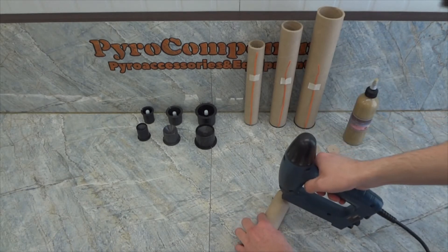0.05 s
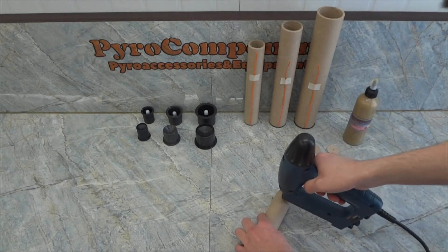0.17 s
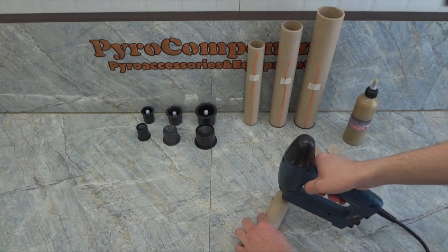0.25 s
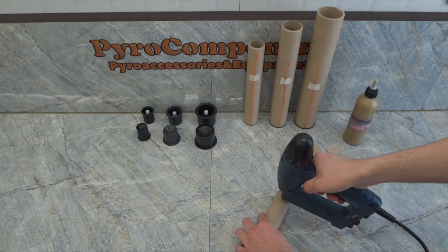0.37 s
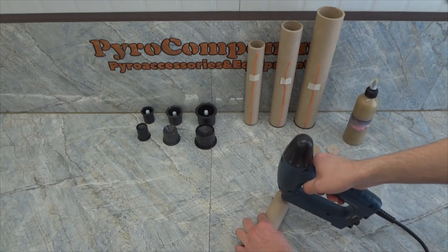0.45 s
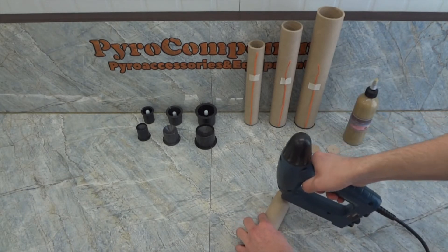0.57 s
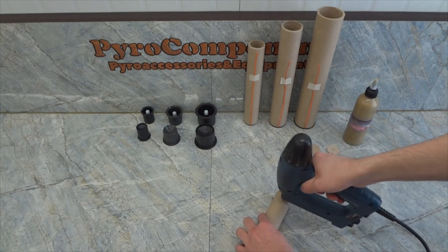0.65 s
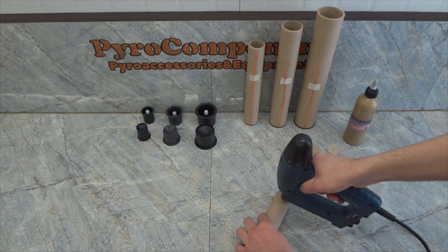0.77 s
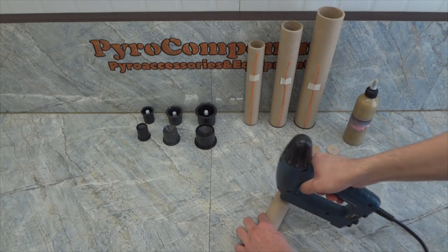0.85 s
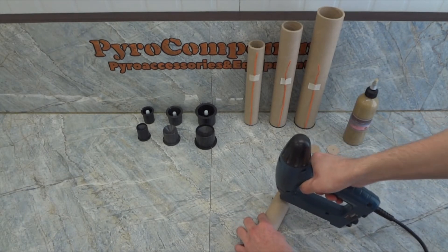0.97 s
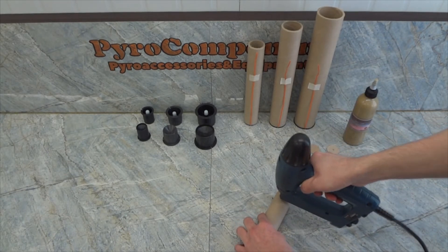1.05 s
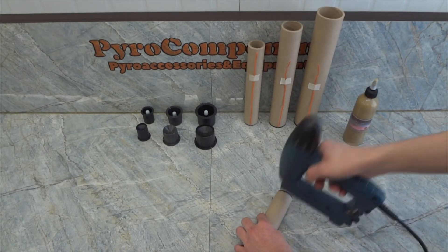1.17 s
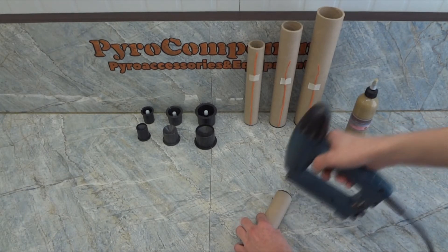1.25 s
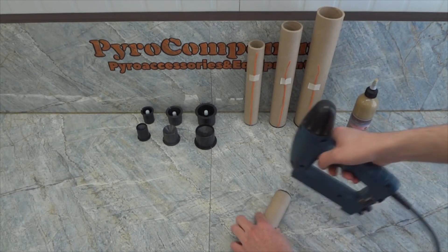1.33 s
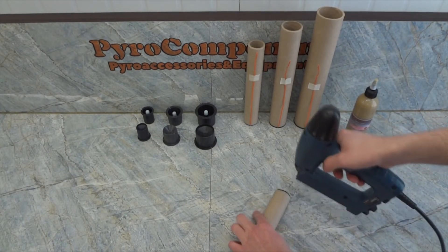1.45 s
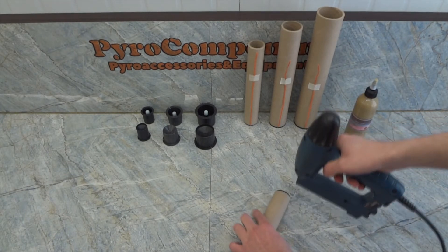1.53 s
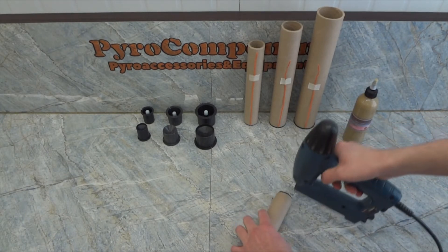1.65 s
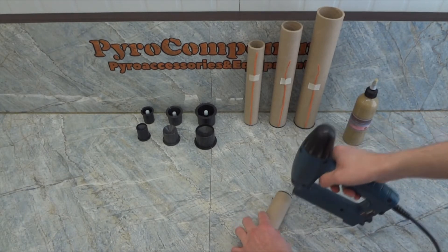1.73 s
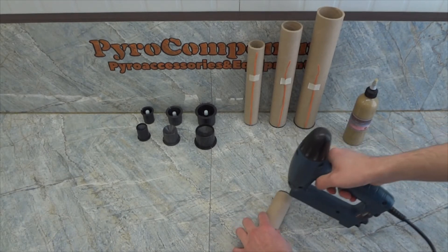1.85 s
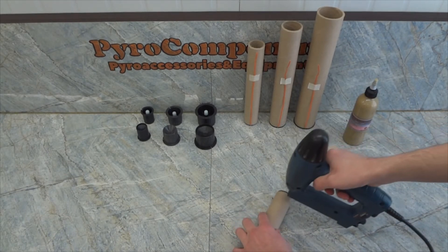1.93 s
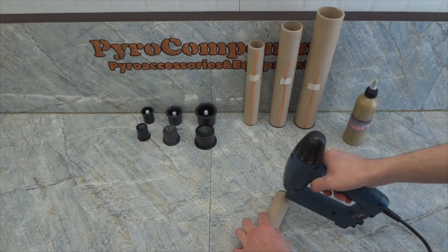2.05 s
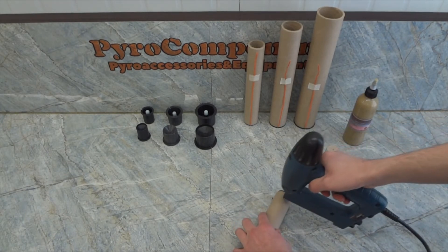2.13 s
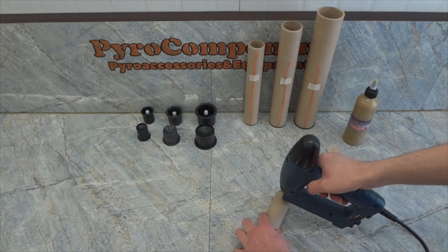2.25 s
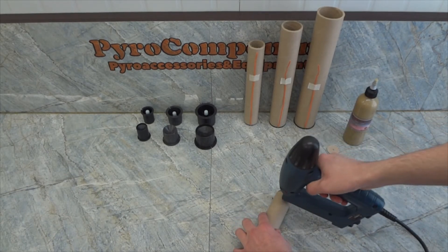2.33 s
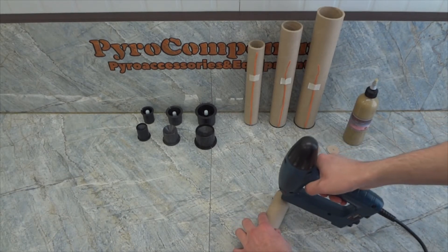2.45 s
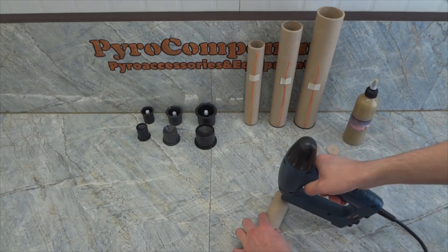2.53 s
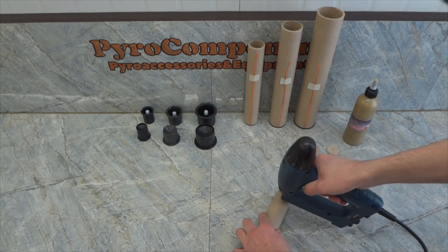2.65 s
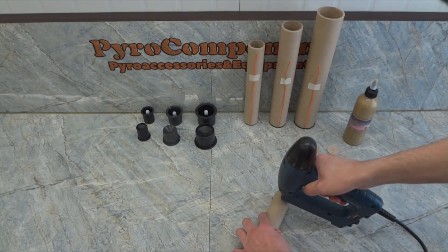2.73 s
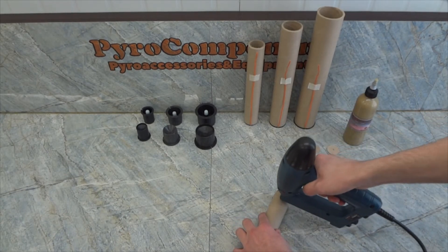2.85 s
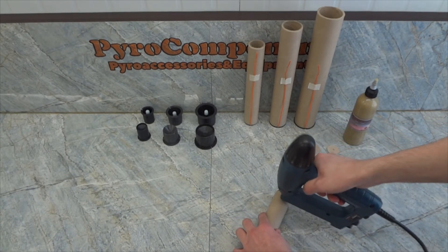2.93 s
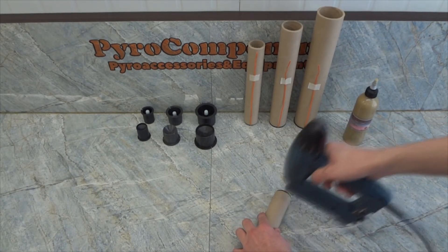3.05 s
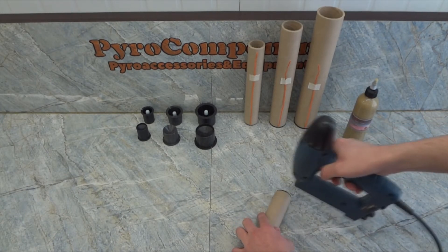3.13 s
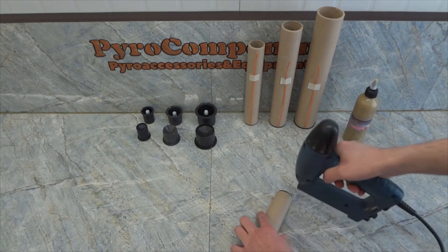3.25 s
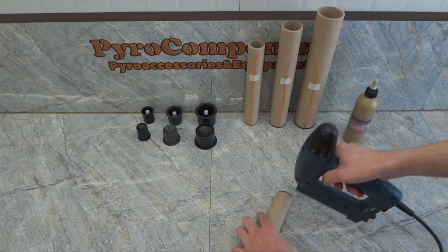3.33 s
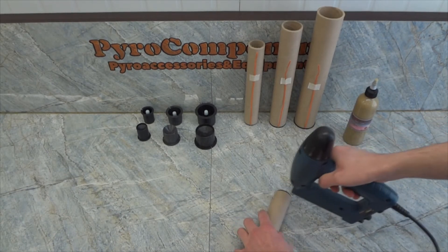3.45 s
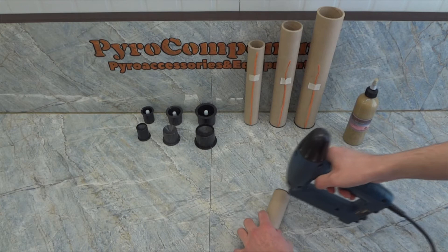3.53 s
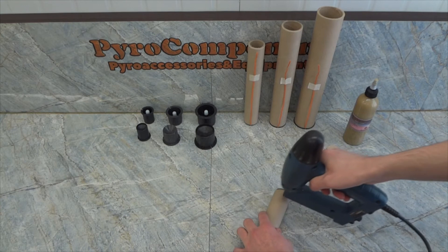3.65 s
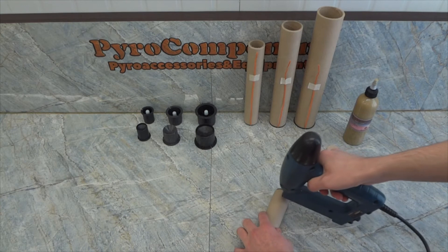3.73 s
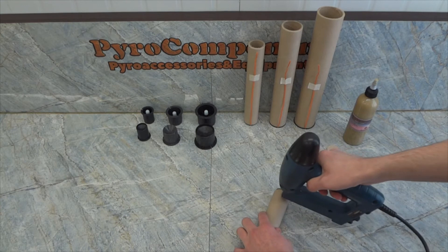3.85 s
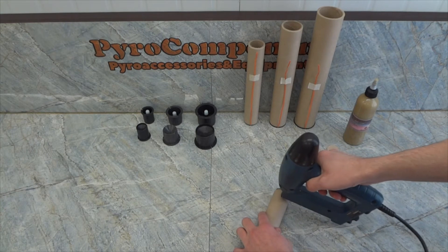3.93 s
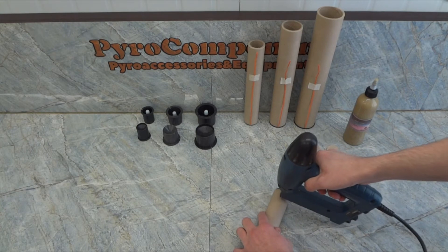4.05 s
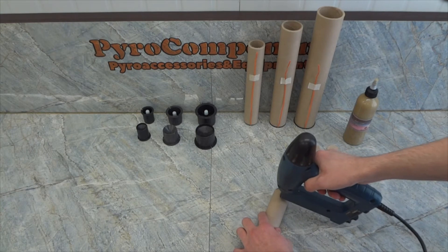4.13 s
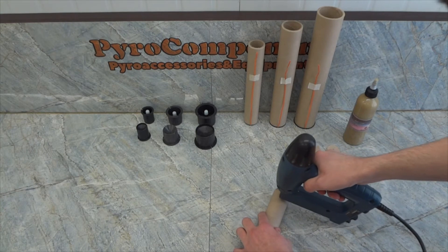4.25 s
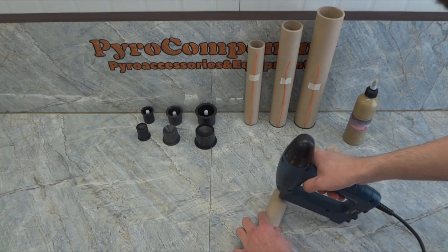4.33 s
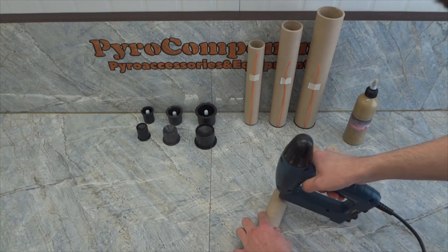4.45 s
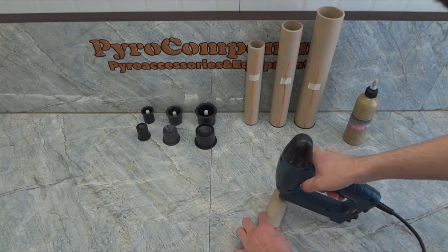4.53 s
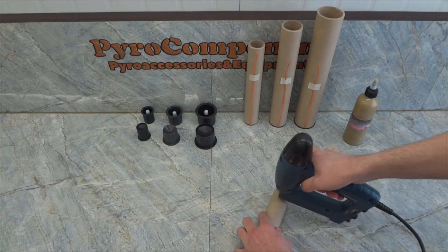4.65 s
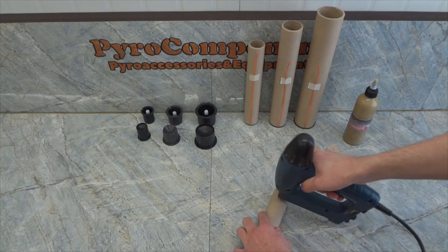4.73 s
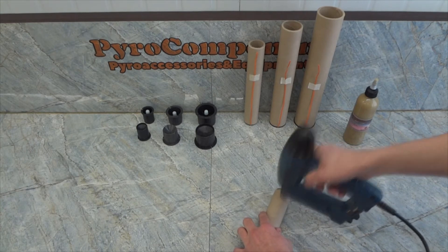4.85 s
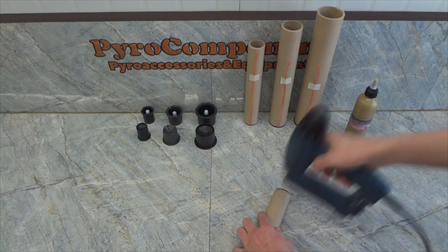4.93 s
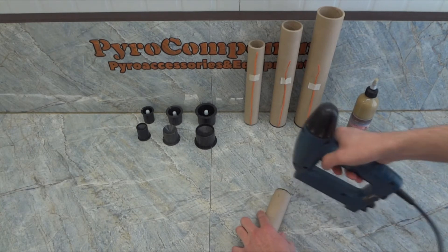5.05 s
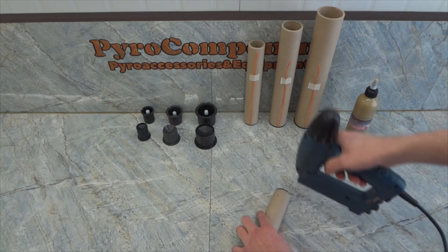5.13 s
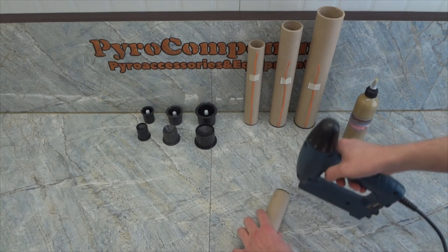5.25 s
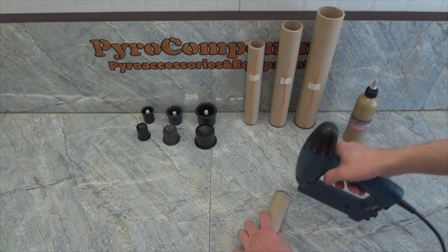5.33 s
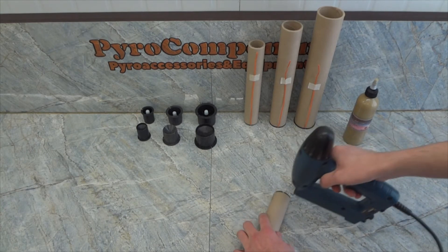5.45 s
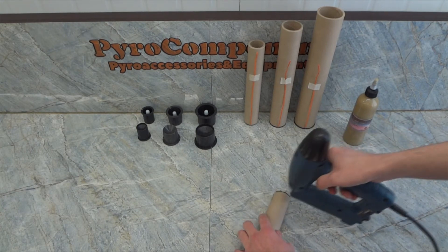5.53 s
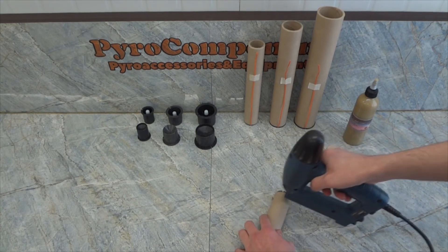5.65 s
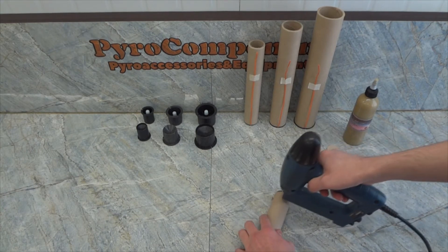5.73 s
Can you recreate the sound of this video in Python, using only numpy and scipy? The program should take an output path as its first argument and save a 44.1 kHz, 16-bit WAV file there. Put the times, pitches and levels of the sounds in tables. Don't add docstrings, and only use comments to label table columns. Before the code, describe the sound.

Three cracking staple gun shots into a cardboard tube ring through a tiled room, separated by faint scrapes, trigger ticks and hollow tube knocks.

```python
import sys
import numpy as np
from scipy import signal
from scipy.fft import rfft, irfft
from scipy.io import wavfile

SR = 44100
rng = np.random.default_rng(int(sys.argv[2]) if len(sys.argv) > 2 else 0)


def undo_db(level):
    steps = np.asarray(level, float) / 20
    return 10 ** steps


def wrap_up_sound(samples):
    columns = np.atleast_2d(samples).T
    tamed = np.clip(columns, -1, 1)
    steps = np.round(tamed * 32767).astype(np.int16)
    wavfile.write(sys.argv[1], SR, steps)


N = 255339
TIME = np.arange(N) / SR

# [f/Hz, level/dB per Hz]
HUSH = [(25, -8), (50, -8), (118, 4), (175, -2.5), (300, -0.5), (500, -1.), (1300, -3), (2000, -6.5),
        (4000, -11.5), (8000, -14), (13000, -14), (14500, -18.5), (15200, -36)]
# [f/Hz, level/dB]
HUSH_SIDE = [(60, -21), (400, 4.5), (1500, 7), (6000, -3.5), (14000, -10.5)]
HUSH_DB = -69
# [f/Hz, rms level/dB]
WHINE = [(13485, -82.5), (13905, -84.5)]
# [f/Hz, t60/s, echo level/dB, side minus mid level/dB]
ROOM = [(40, 0.99, 0.9, -30.5), (120, 0.87, -0.5, -45), (177, 0.84, 2, -30.5), (280, 0.6, 0.35, -28.5),
        (455, 0.48, 4.5, -18.5), (960, 0.39, 7.5, -14.5), (1590, 0.37, 5, -10), (2900, 0.45, 2, -14.5),
        (4000, 0.4, 4, -13), (6000, 0.34, -0.7, -12.5), (8450, 0.3, -2.8, -13.5), (11200, 0.23, 5, -15.5),
        (14600, .19, 3.3, -15)]

# [f/Hz, level/dB per Hz]
RUB = [(1200, -25.5), (2050, 2), (3000, -6.5), (4300, -7), (5400, -7.5), (7900, -7), (10200, -8.5),
       (16000, -16)]
# [lead t/s, level/dB]
SQUEEZES = [
    (0.089, -63),
    (0.053, -64.5),
    (0.049, -61),
]
CREEP_DB_PER_S, SURGE_S, SURGE_DB, LET_GO_S = 108.5, 0.023, 11, .006
# [t/s, level/dB, hold t/s, fade/dB per s]
SCRAPES = [
    (0.001, -57, .003, 285),
    (.06, -74.5, .1, 40),
    (0.303, -69.5, 0.028, 39.5),
    (0.546, -71.5, 0.035, 40),
    (0.713, -76, 0.018, 78),
    (2.35, -53, .004, 360),
    (2.402, -72, .3, 62.5),
    (4.534, -73.5, 0.019, 88),
]
SCRAPE_RISE_DB_PER_S = 1500

# [t/s, plastic shell peak level/dB, metal snap peak level/dB, snap f/Hz]
TICKS = [(.308, -50, -42, 4800), (.549, -50, -44, 3500), (.669, -58, -49, 4000), (.681, -56, -45, 4000),
         (.7045, -52, -39, 4500), (.8115, -53, -33, 7000), (.8625, -54, -40, 4800), (.875, -46, -33, 4200),
         (1.405, -60, -56, 5500), (1.901, -43, -52, 3500), (2.2835, -36, -43, 3900),
         (2.402, -45, -58, 6000), (2.7442, -56, -38, 5200), (2.811, -44, -35, 4000),
         (3.840, -56, -54, 3500), (4.1045, -40, -45, 7500), (4.282, -38, -49, 3500),
         (4.339, -42, -66, 3000), (4.542, -64, -51, 5000), (4.557, -60, -48, 3000), (4.576, -62, -51, 3000),
         (4.6435, -58, -33, 8000), (5.058, -48, -25, 5400)]
# [f/Hz, width/Hz, level/dB]
SHELL = [(660, 300, -13), (1580, 950, 0)]
SNAP_WIDTH = .75

# [t/s, peak level/dB, contact t/ms, pitch factor]
KNOCKS = [(.002, -43.5, 0.84, 0.73), (.030, -53, 1.6, 0.57), (.497, -46.5, 1.05, 0.89),
          (0.515, -51, 0.49, 1.2), (.668, -50.5, 2.2, 0.93), (0.821, -49.5, 1.2, 0.93),
          (2.342, -46, 2, 0.79), (2.3516, -33, 1.5, 1.3), (3.7345, -11.5, 0.88, 1.01),
          (4.138, -59, .7, 0.95), (5.308, -47, 2.08, 1.56), (5.326, -53.5, 2, 1.3), (5.344, -58, 2.4, 1.43)]
# [f/Hz, width/Hz, level/dB]
TUBE = [(348, 55, 3), (432, 19, -5), (496, 57, 3), (536, 50, -1.5), (615, 69, -1.5), (744, 20, 4),
        (853, 110, -1.5), (949, 100, 2), (1064, 36, -1.5), (1180, 80, -7.5)]
RIM_DB, RIM_DB_PER_MS = -11, -5.5
# [t/s, peak level/dB]
THUDS = [
    (.002, -55),
    (2.343, -51.5),
    (3.736, -56),
]

SHOT_S = [
    .8917,
    2.8322,
    4.6927,
]
# [blow level/dB, brightness/dB per octave, tube share level/dB, floor thud level/dB]
SHOTS = [
    (20., 0.81, -7.5, 5),
    (19.5, 0.28, -7.5, 2.5),
    (19, 0.81, -2.9, 5.5),
]
# [f/Hz, level/dB per Hz]
BANG = [(70, -36), (125, -23.5), (195, -28), (270, -16.5), (650, 0.6), (950, -4.5), (1200, -9.5),
        (1400, -1.5), (1680, -9.5), (2000, 0), (3800, -6), (6500, 0.5), (13400, -5), (16000, -14)]
# [lead t/s, level/dB]
RUN_UP = [(.0066, -24.), (.0032, -24.), (.001, -24.)]
# [f/Hz, t60/s, level/dB after shot 1, shot 2, shot 3]
RINGS = [(127.8, 0.84, -33, -30.5, -32.), (439, 1.5, -49, -46.5, -50), (690, 0.9, -52., -43.5, -56),
         (1312, 2.8, -55.5, -65.5, -62), (1393, 3.7, -69.5, -69, -61), (1944, 0.75, -29, -42, -39)]

# [t/s, dip level/dB, recovery t/s, curve of the climb]
DIPS = [
    (SHOT_S[0], 36.9, 0.22, 1.68),
    (SHOT_S[1], 37.24, 0.23, 1.77),
    (3.734, 12, 0.031, 1.34),
    (SHOT_S[2], 37.05, 0.24, 2.01),
]
TOP_HZ = 15850


def add(track, s, sound, db):
    i = int(s * SR)
    track[i:i + len(sound)] += undo_db(db) * sound[:N - i]


def gains(points, size):
    hz, db = np.transpose(points)
    return undo_db(np.interp(np.log(np.fft.rfftfreq(size, 1 / SR) + 1), np.log(hz), db))


def colour(x, points):
    cepstrum = irfft(np.log(gains(points, size=4096)))
    cepstrum[1:2048] *= 2
    cepstrum[2049:] = 0
    response = irfft(np.exp(rfft(cepstrum)))[:2048]
    response = response / np.sqrt(np.sum(response ** 2))
    return signal.fftconvolve(x, response)[:len(x)]


def ring(x, hz, width_hz):
    return signal.lfilter(*signal.iirpeak(hz, hz / width_hz, fs=SR), x)


def burst(decay_ms, size=2048):
    decay = np.exp(-np.arange(size) / (SR * decay_ms / 1000))
    return rng.standard_normal(size) * decay / 2


def thin(x):
    return signal.sosfilt(signal.butter(2, 350., "high", fs=SR, output="sos"), x)


def push(contact_ms):
    u = np.arange(8192) / SR * 1000 / max(contact_ms, .1)
    return np.sin(np.pi * np.minimum(u, 1)) ** 2


def tube(force, pitch):
    y = 0
    for k, (hz, width, db) in enumerate(TUBE):
        y = y + (-1) ** k * undo_db(db) * ring(force, hz * pitch, width)
    y = signal.sosfilt(signal.butter(3, [250., 1350.], "band", fs=SR, output="sos"), y)
    return y / np.abs(y).max()


def room(direct, source, echo_db, rise_ms):
    t = np.arange(SR) / SR
    noise, tail = rfft(rng.standard_normal((2, SR))), 0
    log_hz = np.log(np.arange(noise.shape[1]) + 1)
    log_centres = np.log(np.array(ROOM)[:, 0])
    for k, (hz, t60, db, side_db) in enumerate(ROOM):
        share = np.interp(log_hz, log_centres, np.arange(len(ROOM)) == k)
        level_db = db - 60 * t / t60 + np.array([[0], [side_db]])
        tail = tail + irfft(noise * share, SR) * undo_db(level_db)
    tail *= undo_db(echo_db) * (1 - np.exp(-(t * 1000 / rise_ms) ** 2))
    mid, side = signal.fftconvolve(source[None], tail)[:, :N]
    return direct + np.array([mid + side, mid - side])


def hush():
    mid, side = rfft(rng.standard_normal((2, N))) * gains(HUSH, N)
    mid, side = irfft(mid, N), irfft(side * gains(HUSH_SIDE, N), N)
    whine = sum(undo_db(db) * np.sqrt(2) * np.sin(2 * np.pi * hz * TIME) for hz, db in WHINE)
    return np.array([mid + side, mid - side]) * undo_db(HUSH_DB) / mid.std() + whine


def effort():
    out = 0
    for s, (lead, db) in zip(SHOT_S, SQUEEZES):
        left = s - LET_GO_S - TIME
        climb_db = CREEP_DB_PER_S * (lead - left) + SURGE_DB * np.clip(1 - left / SURGE_S, 0, 1)
        out = out + (left > 0) * (TIME > s - lead) * undo_db(db + np.clip(climb_db, 0, 40))
    for s, db, hold, fade in SCRAPES:
        rise_db = SCRAPE_RISE_DB_PER_S * np.maximum(s - TIME, 0)
        fade_db = fade * np.maximum(TIME - s - hold, 0)
        out = out + undo_db(db - rise_db - fade_db)
    return out


def rubs():
    grain_level = np.minimum(rng.exponential(size=N // 60 + 1), 2.5)
    grains = rng.standard_normal(N) * undo_db(3 * np.repeat(grain_level, 60)[:N])
    return colour(grains * effort(), RUB) / grains.std()


def ticks():
    dry = np.zeros(N)
    for s, shell_db, snap_db, snap_hz in TICKS:
        crack = signal.unit_impulse(2048) + 0.18 * burst(decay_ms=3.1)
        parts = [(hz, width, shell_db + db) for hz, width, db in SHELL]
        parts.append((snap_hz, SNAP_WIDTH * snap_hz, snap_db))
        for hz, width, db in parts:
            band = ring(ring(crack, hz, width), hz, width)
            add(dry, s, band / np.abs(band).max(), db)
    return dry


def knocks():
    dry = np.zeros(N)
    for s, db, contact_ms, pitch in KNOCKS:
        crack = signal.unit_impulse(8192) + 0.28 * burst(decay_ms=2.3, size=8192)
        edge = ring(crack, 1800., 800.)
        rim = undo_db(RIM_DB + RIM_DB_PER_MS * contact_ms) * edge / edge.max()
        add(dry, s, tube(push(contact_ms), pitch) + rim, db - 6.0)
    for s, db in THUDS:
        thud = ring(push(contact_ms=1.8), 80., 70.)
        add(dry, s, thud / thud.max(), db)
    return dry


def rings():
    out = np.zeros(N)
    t = np.arange(2 * SR) / SR
    for hz, t60, *levels in RINGS:
        for s, db in zip(SHOT_S, levels):
            detune_hz, phase = rng.standard_normal((2, 3, 1))
            tone_hz = hz + 3.5 * detune_hz * [[0], [1], [1]]
            tones = np.sin(2 * np.pi * (tone_hz * t + phase)) * [[1], [.3], [.3]]
            fade = undo_db(-60 * t / t60) * np.minimum(t / .02, 1)
            add(out, s, tones.sum(axis=0) * fade, db)
    return out


def run_up():
    dry = np.zeros(N)
    for s in SHOT_S:
        for lead, db in RUN_UP:
            add(dry, s - lead, thin(colour(burst(decay_ms=0.8), BANG)), db)
    return dry


def shots():
    out, impulse = 0, signal.unit_impulse(2048)
    for s, (blow_db, tilt_db, tube_db, thud_db) in zip(SHOT_S, SHOTS):
        direct, source = np.zeros((2, N))
        blow = [(hz, db + tilt_db * np.log2(hz / 2000) + thud_db * (hz < 220)) for hz, db in BANG]
        add(direct, s, thin(colour(burst(decay_ms=7.0), blow)), blow_db + 4.0)
        add(source, s, colour(impulse, blow), blow_db + 7.5)
        add(source, s, tube(impulse, pitch=0.88), blow_db + tube_db - 30.5)
        out = out + room(direct, source, echo_db=-16., rise_ms=2.5)
    return out


def scene():
    hands, taps = ticks() + run_up() + rubs(), knocks()
    near_hands = room(hands, hands, echo_db=-34.5, rise_ms=4.)
    near_taps = room(taps, taps, echo_db=-33.5, rise_ms=1.0)
    return hush() + near_hands + near_taps + rings() + shots()


def roll_off(x):
    return signal.sosfilt(signal.butter(12, 16650, fs=SR, output="sos"), x)


def record(dry):
    dip_db = 0
    for s, db, recovery, curve in DIPS:
        remaining = np.clip(1 - (TIME - s) / recovery, 0, 1) * (TIME > s - 2 / SR)
        dip_db = dip_db + db * remaining ** curve
    loud = np.tanh(1.074 * dry * undo_db(-dip_db)) / 0.76
    loud = signal.sosfilt(signal.butter(2, 38, "high", fs=SR, output="sos"), loud)
    top_cut = signal.ellip(10, .2, 70, TOP_HZ, fs=SR, output="sos")
    return roll_off(signal.sosfilt(top_cut, loud))


dry = scene()
out = record(dry)
wrap_up_sound(out)
```